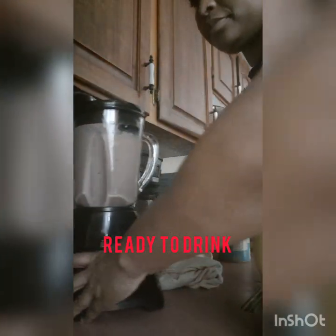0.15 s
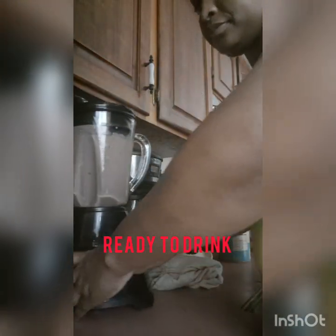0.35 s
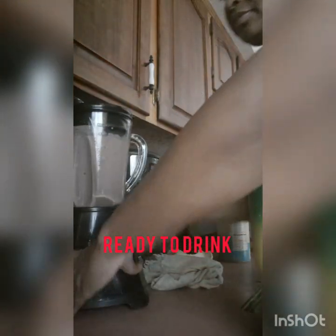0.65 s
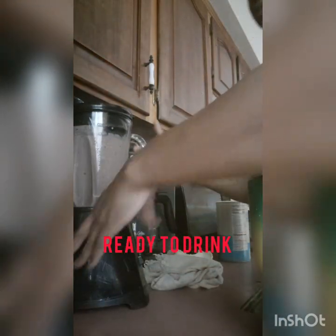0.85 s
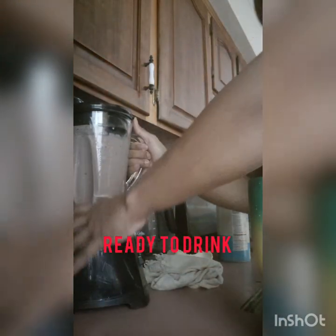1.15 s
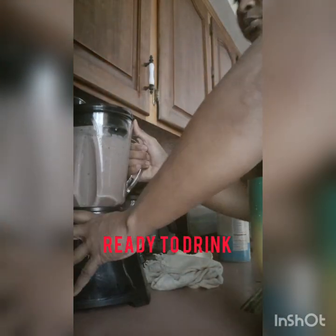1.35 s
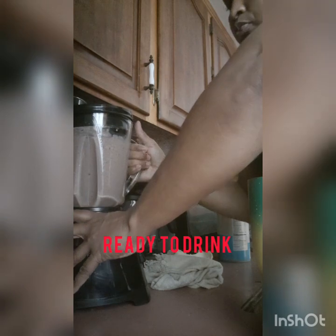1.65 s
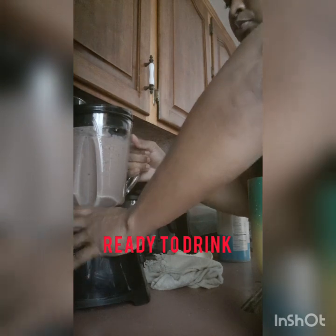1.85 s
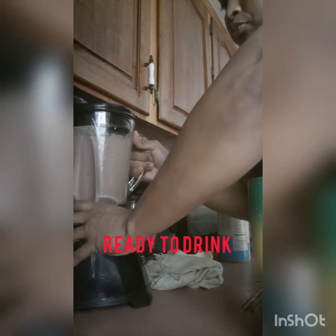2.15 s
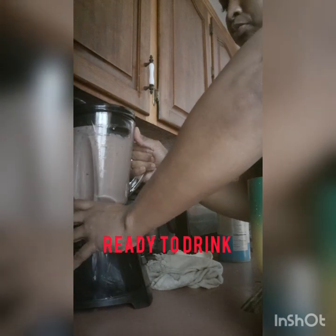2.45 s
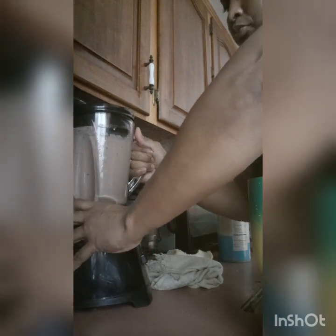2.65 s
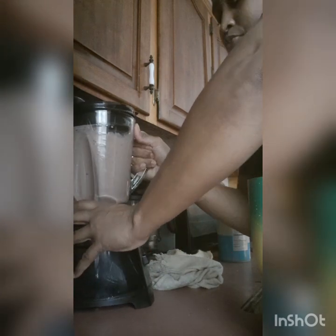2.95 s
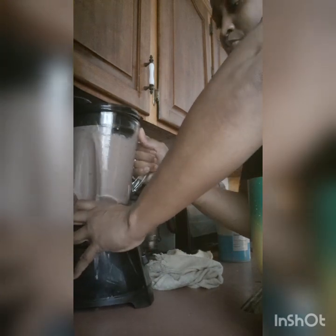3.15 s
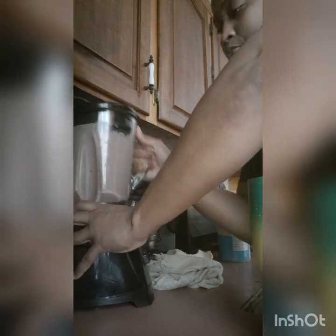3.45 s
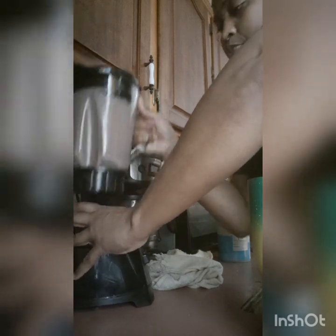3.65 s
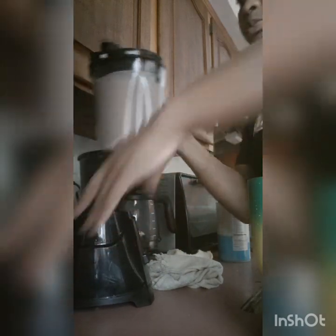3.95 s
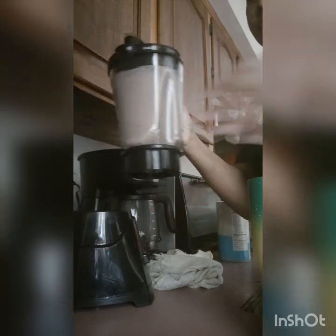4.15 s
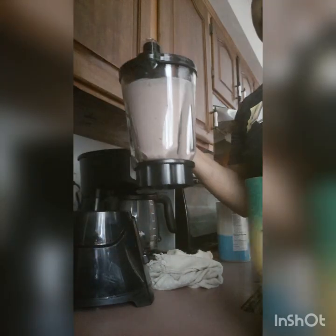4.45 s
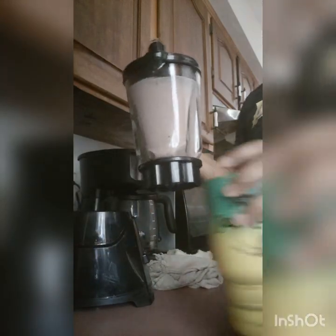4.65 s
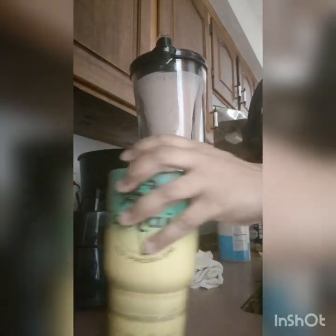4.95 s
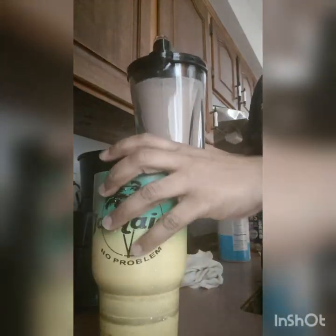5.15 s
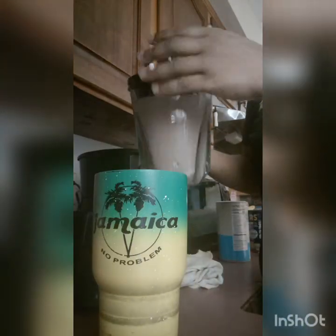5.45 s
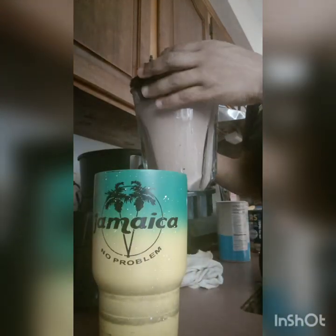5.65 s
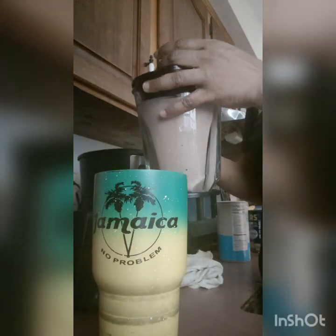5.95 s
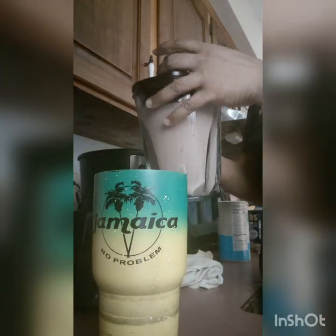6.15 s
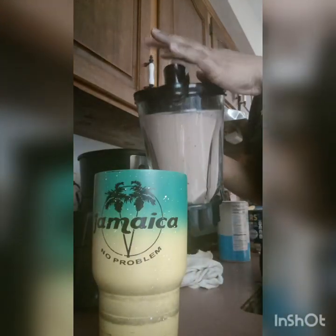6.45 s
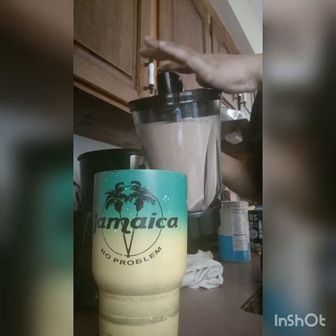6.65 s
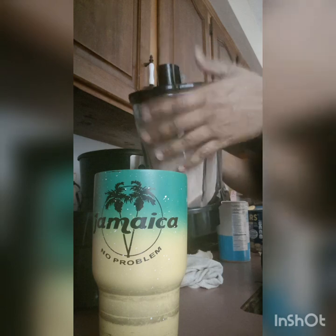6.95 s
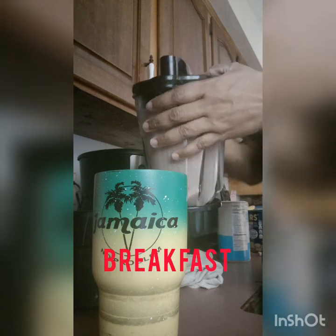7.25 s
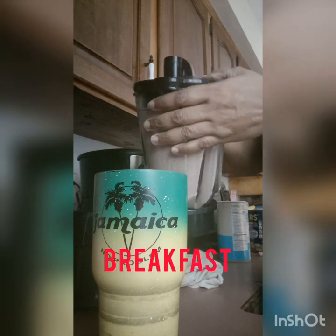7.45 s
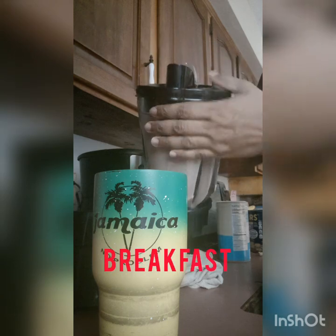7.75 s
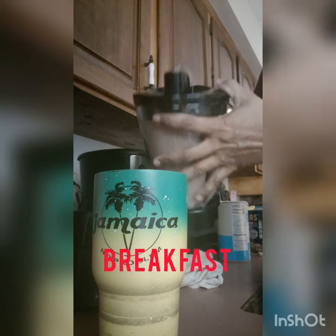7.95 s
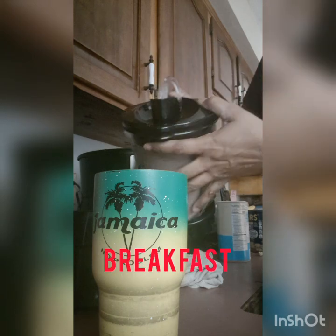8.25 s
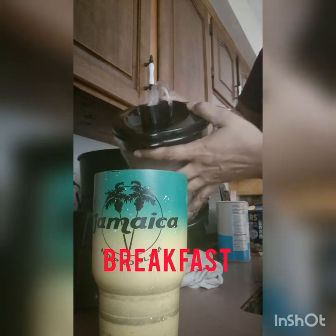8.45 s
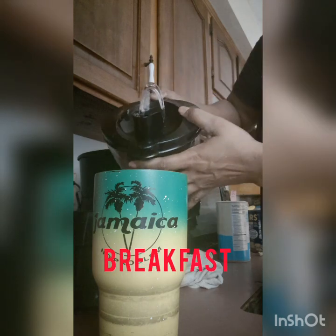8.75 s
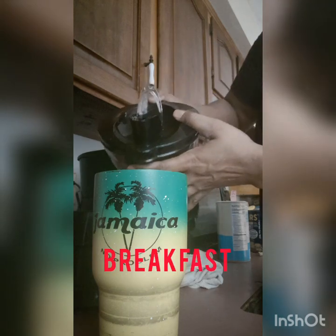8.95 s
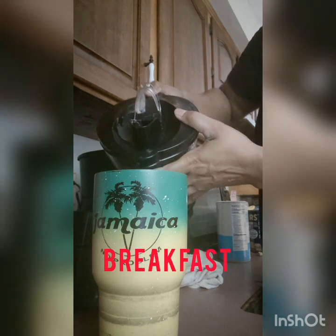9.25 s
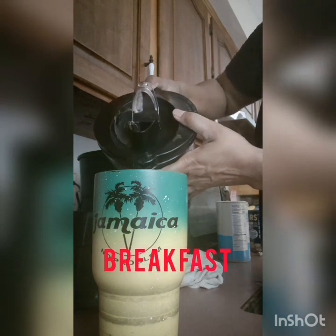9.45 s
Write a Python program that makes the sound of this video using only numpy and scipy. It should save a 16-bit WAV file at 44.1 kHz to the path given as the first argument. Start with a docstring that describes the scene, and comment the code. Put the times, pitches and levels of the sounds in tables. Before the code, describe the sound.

A full plastic blender jar knocks and clunks loose from its base, then a steel tumbler scrapes across the counter and lands with a heavy thud.

```python
"""First a palm brushes and a plastic blender base scuffs over a kitchen counter, then the full jar knocks
in its socket as it is twisted off. A steel tumbler is dragged over and set down ringing, then come
squeaks, thin whistles and rubbing as the lid is patted and pried loose. An appliance hums faintly behind.
Blows are dying sine modes and noise bursts; rubbing is filtered, grainy noise; friction keeps
the steel modes singing; the kitchen adds a diffuse tail."""
import sys
import numpy as np
from scipy import signal
from scipy.fft import rfft, irfft
from scipy.io import wavfile
from scipy.ndimage import uniform_filter1d

SR = 44100
rng = np.random.default_rng(int(sys.argv[2]) if len(sys.argv) > 2 else 0)


def store_pcm(level_fs):
    """Save levels as 16-bit WAV."""
    pcm = np.round(np.clip(level_fs, -1, 1) * 32767).astype(np.int16)
    wavfile.write(sys.argv[1], SR, np.atleast_2d(pcm).T)


N = 423360
TIME = np.arange(N) / SR  # every sample [s]
STEPS = np.arange(0, N / SR, 0.001)  # coarse clock for slow changes [s]

# Levels are in dB; some sounds add a further balance of their own.
# knocks of jar, base and lid: (time [s], hollow body level [dB], wall level [dB], crack level [dB],
# sharp edge against the crack [dB], favoured wall mode [Hz])
KNOCKS = [(0.052, -39.5, -39, -40, -20.5, 907), (0.3624, -38, -44.5, -42, -15, 641),
          (0.6445, -45.5, -28.5, -32, -26, 1090), (0.66, -38.5, -48, -64, -14.5, 700),
          (1.1611, -33.5, -33.5, -19.5, -13.5, 883), (1.696, -41.5, -54.5, -54, -27, 770),
          (1.7412, -39.5, -47.5, -34.5, -36.5, 1050), (2.2523, -34, -34, -40, -21, 759),
          (2.3437, -32.5, -30, -51, -25.5, 643), (2.4308, -31.5, -28.5, -39.5, -14.5, 720),
          (2.5009, -36, -41, -34, -26.5, 650), (2.5127, -33, -40.5, -23.5, -15.5, 2202),
          (2.8177, -37.5, -41, -29.5, -28.5, 3080), (2.832, -22.5, -30.5, -22, -21.5, 1180),
          (2.8853, -39.5, -44.5, -43.5, -17.5, 1100), (2.979, -36, -39.5, -56, -23.5, 808),
          (3.1571, -32, -39.5, -28, -16, 2790), (3.1762, -29.5, -41.5, -45, -12.5, 960),
          (3.2531, -40.5, -49, -46, -25.5, 800), (3.467, -47.5, -45, -48.5, -20.5, 1140),
          (3.5226, -43.5, -49, -40.5, -23, 1500), (3.5906, -39.5, -34.5, -21.5, -23.5, 2270),
          (3.6074, -38.5, -33.5, -50.5, -17, 1368), (3.7703, -44.5, -45.5, -47, -10.5, 690),
          (3.7848, -48, -45.5, -38.5, -20.5, 750), (3.817, -51.5, -39.5, -46, -12, 655),
          (6.3176, -50, -48, -37, -9, 1481), (6.338, -63.5, -51, -52.5, -6, 2810),
          (6.381, -59.5, -53, -54, -8, 1096), (6.8138, -35.5, -47.5, -51.5, -17.5, 546),
          (7.4702, -76.5, -40, -34.5, -6.5, 2820)]
# hollow ring of jar and base, before grip and damping: (frequency [Hz], level [dB], time to fall 60 dB [s])
JAR_MODES = [(97.57, -7.5, 0.1596), (174, -11, 0.16), (264.54, 1, 0.1163), (350.7, -7.5, 0.14),
             (388.6, 5, 0.0718), (460.3, -4, 0.084)]
# ringing of the plastic wall, before damping: (frequency [Hz], level [dB], time to fall 60 dB [s])
WALL_MODES = [(564.5, -11.5, 0.062), (708.6, 3, 0.027), (936, 2.5, 0.075), (1073, 8.5, 0.042),
              (1172, 13.5, 0.025), (1410, 0.5, 0.095), (1764.5, -2, 0.22), (2146, 1, 0.067),
              (2603, -17, 0.03), (2646, -9.5, 0.067), (2954, -10, 0.043)]
# colour of the plastic shell's dense ring: (frequency [Hz], level [dB per Hz])
SHELL_COLOUR = [(300, 13), (500, 5.5), (750, 7.5), (1150, 2.5), (1700, -6), (2150, -3.5), (2600, -7),
                (3200, -7), (4000, -6.5), (5200, -11.5), (7700, -6), (9000, -15), (15500, -24)]
KNOCK_LENGTH = 0.854  # factor on all ring times: the hand damps the plastic
CLACK_BODY_SHARE = 0.28  # the shell's clack follows the wall, and partly the body
CHATTER_S, CHATTER_DB = 0.009, -13.5  # loose plastic touches again about this much later, this much weaker

# scrapes of plastic on plastic, mostly short, with a long faint rub of the lid:
# (time [s], length [s], lowest frequency [Hz], highest frequency [Hz], level [dB])
SCRAPES = [(0.046, 0.0603, 910, 4440, -48), (0.575, 0.02, 890, 6040, -57), (0.619, 0.056, 890, 4200, -46.5),
           (1.848, 0.0538, 2220, 15200, -52), (2.623, 0.037, 1000, 8450, -61.5),
           (2.689, 0.0407, 790, 8000, -58), (2.909, 0.068, 2000, 8500, -63),
           (3.114, 0.0635, 1950, 8500, -63), (3.472, .03, 700, 2420, -52), (3.514, 0.0525, 1220, 8360, -53),
           (3.882, 0.35, 2300, 4600, -74.5), (6.316, 0.086, 11100, 16100, -56), (6.32, 0.1, 597, 4500, -58),
           (7.469, 0.177, 2130, 3236, -67.5), (7.698, 0.88, 2318, 2700, -85)]

# the base is shoved over the counter on juddering feet:
# (time [s], length [s], level [dB], start frequency [Hz], end frequency [Hz])
SHOVES = [(0.015, 0.136, -42.5, 607, 427), (0.237, 0.1894, -33, 416, 110), (0.462, 0.28, -44.5, 200, 230),
          (0.652, 0.018, -42.5, 297, 260)]
SHOVE_RISE_S, SHOVE_FALL_S, JUDDER_DB_PER_OCTAVE = 0.1215, 0.073, 7  # rise and fall: seconds per 20 dB
# colour of the scuffing: (frequency [Hz], level [dB per Hz])
SCUFF_COLOUR = [(29, -44), (50, -2), (96, 5), (216, -12), (256, 2.5), (310, -10.5), (358, -2), (423, -15),
                (652, -11), (1970, -23.5), (2170, -20.5), (4670, -30), (7020, -28), (15500, -45.5)]

# a palm brushes over the base: (time [s], length [s], level [dB], time to fall 20 dB [s])
BRUSHES = [(0.005, 0.134, -48.5, 0.0031), (0.193, 0.052, -49, 0.2), (0.268, 0.111, -53, 0.2623),
           (0.427, 0.062, -60.5, 0.48), (0.635, 0.0073, -50.5, 0.14), (0.759, 0.0254, -54.5, 0.0772)]
BRUSH_RISE_S = 0.0764  # seconds per 20 dB
# hands and sleeves shift on the jar: (time [s], length [s], low rumble level [dB], rustle level [dB])
GRIPS = [(0.842, 0.033, -58, -81), (1.205, 0.095, -48.5, -63.5), (1.736, 0.057, -43.5, -67),
         (1.846, 0.0236, -42.5, -63), (2.133, 0.185, -58.5, -69.5), (2.471, 0.25, -50, -70),
         (2.829, 0.027, -44, -62), (3.151, 0.135, -46.5, -64), (3.529, 0.058, -46.5, -62.5),
         (3.798, 0.222, -58.5, -69), (4.183, 0.173, -61, -71.5)]
GRIP_RISE_S, GRIP_FALL_S = 0.196, 0.401  # seconds per 20 dB
# colour of the rustle: (frequency [Hz], level [dB per Hz])
RUSTLE_COLOUR = [(500, 4.5), (1500, 2), (2600, 0.5), (4000, -0.5), (5000, -5), (7600, -1.5), (9200, -12),
                 (15500, -10)]
# fingers wipe off the tumbler and work at the lid: (time [s], length [s], level [dB])
WIPES = [(5.191, 0.0029, -57), (5.242, 0.034, -59.5), (5.604, 0.0104, -60.5), (5.712, 0.0081, -60.5),
         (6.078, 0.019, -62), (6.128, 0.086, -73.5), (6.318, 0.011, -51.5), (6.357, 0.0116, -59.5),
         (7.042, 0.0092, -66), (7.203, 0.087, -72), (7.503, 0.041, -68.5), (7.795, 0.037, -70.5),
         (7.874, 0.073, -72), (8.06, 0.015, -75), (9.133, 0.127, -66), (9.554, 0.0203, -73)]
WIPE_RISE_S, WIPE_FALL_S = 0.0393, 0.092  # seconds per 20 dB
# colour of the fingers: (frequency [Hz], level [dB per Hz])
FINGER_COLOUR = [(1200, -11.5), (2200, -4.5), (3400, -2.5), (5000, -6), (7500, 1.5), (9500, -5.5),
                 (14500, -8)]
# squeaks and thin whistles as fingers leave the tumbler and rub the lid:
# (time [s], length [s], start frequency [Hz], end frequency [Hz], level [dB])
SQUEAKS = [(5.22, 0.1074, 3252, 3239, -66.5), (5.597, 0.042, 3750, 3522, -73),
           (5.69, 0.057, 3766, 3640, -60.5), (6.068, 0.0576, 3850, 3900, -68.5),
           (6.178, 0.1325, 3157, 3290, -68), (6.183, 0.098, 2300, 2544, -68),
           (7.349, 0.2, 4194, 4350, -74.5)]

# thuds on the counter: (time [s], thud level [dB], hardness of the contact [dB])
THUDS = [(4.5, -28.5, -9), (4.583, -35, -18), (4.941, -28, -16), (4.956, -31, 3), (5.0349, -15, -10),
         (5.125, -37.5, -16), (5.168, -35.5, -17.5), (5.198, -35.5, 0), (9.187, -36, -20.5),
         (9.238, -30.5, -15.5), (9.326, -33.5, -16), (9.413, -36.5, -30)]
# counter top modes: (frequency [Hz], level [dB], time to fall 60 dB [s])
COUNTER_MODES = [(118.4, -16, 0.15), (202.4, -1.5, 0.1), (245.7, 2, 0.077), (301.4, -4, 0.044),
                 (380, -16.5, 0.07), (475.2, -10.5, 0.0736), (737, -25, 0.0428)]
CLACK_GROWTH = 0.44  # extra clack [dB] per dB of hardness
# grit catching under the tumbler's rim: (time [s], level [dB])
CATCHES = [(4.7133, -27.5), (4.812, -37.5), (4.83, -30), (4.845, -34), (4.942, -42.5), (5.146, -55.5)]

# the tumbler slides, louder and louder until it stops:
# (time [s], length [s], friction level [dB], wall ringing level [dB], ringing's time to fall 20 dB [s])
SLIDES = [(4.53, 0.282, -30.5, 2, 0.1348), (4.931, 0.0491, -37.5, -2, 0.7076)]
SLIDE_RISE_S, SLIDE_STOP_S = 0.03, 0.0426  # seconds per 20 dB
TIPPED_S, TIPPING_S = 4.95, 0.016  # the tumbler tips onto its rim's edge: start, length
SEATED_S, SEATING_S, SEATED_DB = 5.078, 0.025, -35  # the base comes down flat and damps the wall
# colour of the dragging: (frequency [Hz], level [dB per Hz])
DRAG_COLOUR = [(59, -48.5), (100, -11), (248, 16), (420, -10.5), (640, -7), (898, -8), (1090, -17.5),
               (1920, -21.5), (3930, -20.5), (4190, -18.5), (4660, -27.5), (8060, -22), (8770, -24),
               (13100, -27.5), (15500, -25)]
GRIT_PER_S, GRIT_SPREAD_DB = 140, 7  # tiny catches under the sliding rim
# steel wall modes: (frequency [Hz], level while sliding [dB], level while tipped on the rim's edge [dB])
STEEL_MODES = [(1098, -43, -46), (1378, -58, -55), (1568, -53, -64), (2330, -64, -66), (2501, -55, -69),
               (2653, -51, -65), (2736, -50, -67), (2840, -56, -78), (2982, -54, -72), (3032, -52, -71),
               (3235, -56, -78), (3402, -57, -78), (3720, -54, -80), (3844, -53, -70), (3951, -61, -58),
               (4203, -45, -63), (5001, -59, -65), (5762, -59, -54), (5858, -52, -66), (6095, -53, -78),
               (7583, -57, -72), (7855, -53, -62), (8142, -62, -59), (8212, -54, -69), (10148, -63, -73),
               (10907, -66, -76), (12706, -60, -80), (12938, -66, -62), (13200, -64, -63),
               (15434, -66, -76)]
# a faint metallic ring as the tumbler is let go, and as the jar is tipped towards it:
# (time [s], length [s], level [dB])
SHIMMERS = [(5.213, 0.0176, -14.5), (9.129, 0.0895, -3)]
SHIMMER_RISE_S, SHIMMER_FALL_S = 0.053, 0.29  # seconds per 20 dB
# modes of that faint ring: (frequency [Hz], level [dB])
SHIMMER_MODES = [(1077, -66), (2280, -75), (3682, -67), (5715, -71), (5990, -80), (7364, -74), (7810, -80)]

# colour of the low room air: (frequency [Hz], level [dB per Hz])
AIR_COLOUR = [(15, -57.5), (25, -32.5), (44, -10), (69, -6), (134, -13.5), (192, -2.5), (222, -4.5),
              (290, -6), (353, -17.5), (386, -8), (415, -14.5), (462, -14), (1210, -29.5), (1560, -41.5),
              (1800, -35), (2340, -80.5), (3960, -120)]
# colour of the thin hiss: (frequency [Hz], level [dB per Hz])
HISS_COLOUR = [(1000, -12.5), (1900, -14.5), (2250, -0.5), (2480, 3.5), (2750, -4), (3200, -8), (4200, 0),
               (5200, -12), (7500, -0.5), (9500, -9), (15500, -11)]
AIR_DB, HISS_DB = -52, -76.5
# appliance hum: (frequency [Hz], level [dB])
HUM = [(59.2, -65), (199.2, -63.5), (646, -71.5), (708, -84)]
# kitchen echo tail: (frequency [Hz], time to fall 60 dB [s])
KITCHEN_DECAY = [(100, 0.925), (250, 0.48), (1000, 0.47), (4000, 0.37), (8000, 0.254), (15000, 0.46)]
# likeness of the noise at the two microphone ports: (frequency [Hz], correlation [-1 to 1])
PORT_LIKENESS = [(60, 0.94), (300, 0.95), (600, 0.62), (1200, -0.14), (2500, -0.03), (15000, 0)]
# how near sounds lean to one side, before scaling: (frequency [Hz], left minus right [dB])
SIDE_DB = [(60, 0), (200, -2.5), (400, 1.5), (700, -8.5), (1200, 1.5), (2400, 1), (4400, -11.5), (7400, -8),
           (9000, 0), (15000, 3.5)]
EDGE_HZ = 15900  # upper band limit


def knocks():
    """Each knock rings the hollow jar, its wall and its shell, with a crack and a sharp edge on top."""
    out, t = np.zeros((2, N)), np.arange(2 ** 13) / SR
    for s, body_db, wall_db, crack_db, edge_db, favoured_hz in KNOCKS:
        # the grip shifts the hollow modes a little from blow to blow
        modes = [(hz * rng.uniform(0.97, 1.04), db + rng.normal(0, 1.5), t60 * KNOCK_LENGTH)
                 for hz, db, t60 in JAR_MODES]
        body = ring(modes, t, rise=0.00577, lag_s=0.000117)
        clack = chatter(burst(t, 429, 2403, t60=0.0893 * KNOCK_LENGTH))
        crack = chatter(burst(t, 1640, 8400, t60=0.0612 * KNOCK_LENGTH))
        edge = burst(t, 6450, 16000, t60=0.072 * KNOCK_LENGTH)
        clack_db = wall_db + CLACK_BODY_SHARE * (body_db - wall_db)
        add(out, s, gain_of(body_db - 2.0) * body)
        add(out, s, gain_of(wall_db - 4.5) * wall(t, favoured_hz, KNOCK_LENGTH))
        add(out, s, gain_of(clack_db - 5.5) * clack)
        add(out, s, gain_of(crack_db - 8.0) * crack)
        add(out, s, gain_of(crack_db + edge_db + 0.36) * edge)
    return out


def wall(t, favoured_hz, length, spread=0.1855):
    """The contact point decides which modes of the plastic wall ring most."""
    out = np.zeros((2, len(t)))
    for hz, db, t60 in WALL_MODES:
        share = 1 / (1 + (np.log(hz / favoured_hz) / spread) ** 4)
        port_phase = rng.uniform(0.1, 1, (2, 1)) * hz / 1500
        decay = np.exp(-np.log(1000) * t / (t60 * length))
        out += share * gain_of(db) * decay * np.sin(2 * np.pi * hz * t + port_phase)
    return peaked(out * (1 - np.exp(-t / 0.00048)))


def chatter(blow):
    """A blow is followed by the weaker second touch of a loose part."""
    out = blow.copy()
    delay_s = CHATTER_S * rng.uniform(0.6, 1.4)
    add(out, delay_s, gain_of(CHATTER_DB) * blow[::-1])  # left and right swapped
    return out


def scrapes(grain_db=1.5):
    """Plastic slides on plastic, mostly briefly: a rough rasp that builds fast and fades."""
    out, slips = np.zeros((2, N)), wander(250)
    for s, length, lo_hz, hi_hz, db in SCRAPES:
        size = int(max(length, 0.01) * SR)
        arch = np.sin(np.pi * np.linspace(0, 1, size) ** 0.596)
        pressure = arch * gain_of(grain_db * slips[int(s * SR):][:size])
        rasp = band(noise(SHELL_COLOUR, size=size) * pressure, lo_hz, hi_hz)
        add(out, s, gain_of(db) * evened(rasp))
    return out


def base():
    """The base shudders, drags and scuffs over the counter: rubbing noise in three bands."""
    shudder = judder(centre_hz=100.7) * friction(SCUFF_COLOUR, 55, 169, grain_db=2.25)
    drag = judder(centre_hz=306) * friction(SCUFF_COLOUR, 144, 526, grain_db=0.5)
    scuff = judder(centre_hz=938.5) * friction(SCUFF_COLOUR, 440, 1900, grain_db=3)
    return gain_of(-3.0) * shudder + gain_of(-4.38) * drag + gain_of(-0.38) * scuff


def judder(centre_hz):
    """A band is loudest while the feet judder near its centre frequency."""
    swells = []
    for s, length, db, start_hz, end_hz in SHOVES:
        judder_hz = start_hz + (end_hz - start_hz) * progress(s, length)
        octaves = np.log2(judder_hz / centre_hz)
        swells.append(db + swell(s, length, SHOVE_RISE_S, SHOVE_FALL_S) - JUDDER_DB_PER_OCTAVE * abs(octaves))
    return level(swells)


def palm():
    """A palm brushes the base: bright rubbing noise."""
    brush = level([db + swell(s, length, BRUSH_RISE_S, fall_s) for s, length, db, fall_s in BRUSHES])
    return gain_of(-1.27) * brush * friction(SCUFF_COLOUR, 1673, 17000, grain_db=1.36)


def grips():
    """Hands and sleeves shift on the jar: a slow low rumble and a finer rustle."""
    rumble = level([db + swell(s, length, GRIP_RISE_S, GRIP_FALL_S) for s, length, db, _ in GRIPS])
    rustle = level([db + swell(s, length, GRIP_RISE_S, GRIP_FALL_S) for s, length, _, db in GRIPS])
    out = gain_of(-3) * rumble * friction(SCUFF_COLOUR, 43.85, 754.4, grain_db=5, slips=19.6)
    return out + gain_of(1.71) * rustle * friction(RUSTLE_COLOUR, 807, 16000, grain_db=1.39, slips=94)


def fingers():
    """Fingers wipe off the tumbler and rub the lid: grainy treble noise."""
    wipe = level([db + swell(s, length, WIPE_RISE_S, WIPE_FALL_S) for s, length, db in WIPES])
    return gain_of(-0.22) * wipe * friction(FINGER_COLOUR, 1000, 14800, grain_db=3.0, slips=108)


def squeaks(jitter=0.0552):
    """Squeaks and thin whistles as fingers leave the tumbler and rub the lid: gliding, unsteady tones."""
    out, unsteady = np.zeros((2, N)), wander(910)
    for s, length, start_hz, end_hz, db in SQUEAKS:
        size = int(max(length, 0.01) * SR)
        hz = np.linspace(start_hz, end_hz, size) * (1 + jitter * unsteady[int(s * SR):][:size])
        tone = np.sqrt(2) * np.sin(2 * np.pi * np.cumsum(hz) / SR)
        add(out, s, gain_of(db) * (np.hanning(size) * tone)[None])
    return out


def thuds():
    """Tumbler and jar bump the counter top, which booms; harder contacts clack and click more."""
    out, t = np.zeros((2, N)), np.arange(2 ** 13) / SR
    for s, db, hardness_db in THUDS:
        add(out, s, gain_of(db + 1) * ring(COUNTER_MODES, t, rise=0.00288, lag_s=0.00043))
        add(out, s, gain_of(db + CLACK_GROWTH * hardness_db - 16.0) * burst(t, 450, 1610, t60=0.128))
        add(out, s, gain_of(db + hardness_db - 16.0) * burst(t, 2300, 10020, t60=0.03))
    return out


def catches():
    """Grit catches under the tumbler's rim: single short noise ticks."""
    out, t = np.zeros((2, N)), np.arange(2 ** 13) / SR
    for s, db in CATCHES:
        add(out, s, gain_of(db) * burst(t, 899.5, 15000, t60=0.036))
    return out


def tumbler():
    """The dragged rim judders the counter, grinds, and sets the steel wall singing."""
    boom = ring(COUNTER_MODES, np.arange(2 ** 13) / SR, rise=0.0013, lag_s=0.0004)
    booming = evened(signal.oaconvolve(rng.standard_normal((1, N)), boom)[:, :N])
    grinding = friction(DRAG_COLOUR, 422.4, 1800, grain_db=1.0)
    rasp = friction(DRAG_COLOUR, 1600, 16000, grain_db=1.5, slips=200) + gain_of(-11.5) * grit()
    scraping = through_wall(rasp, width_hz=60, valley_db=-13.5)
    out = gain_of(-5.5) * sliding(build_db=16.5, bend=5.24) * booming
    out += gain_of(-2.59) * sliding(build_db=32.5, bend=2.15) * grinding
    out += gain_of(0.17) * sliding(build_db=33.5, bend=1.023) * scraping
    tipped = progress(TIPPED_S, TIPPING_S)
    return out + steel(STEEL_MODES, singing(build_db=31.5), tipped, width_hz=7, flutter_db=3.5)


def shimmer():
    """A few steel modes ring faintly, waking and dying smoothly."""
    swells = [db + swell(s, length, SHIMMER_RISE_S, SHIMMER_FALL_S) for s, length, db in SHIMMERS]
    tipped = progress(TIPPED_S, TIPPING_S)
    return steel(SHIMMER_MODES, np.max(swells, axis=0), tipped, width_hz=8.26, flutter_db=2, lag_cycles=139)


def sliding(build_db, bend):
    """Friction grows by build_db over a slide; with a high bend it is full early."""
    swells = []
    for s, length, db, _, _ in SLIDES:
        still_missing_db = build_db * (1 - progress(s, length)) ** bend
        swells.append(db - still_missing_db + swell(s, length, SLIDE_RISE_S, SLIDE_STOP_S))
    return level(swells)


def singing(build_db):
    """The wall's ringing (dB) builds with each slide and dies away; seating the tumbler damps it further."""
    swells = []
    for s, length, _, db, ring_s in SLIDES:
        still_missing_db = build_db * (1 - progress(s, length))
        swells.append(db - still_missing_db + swell(s, length, SLIDE_RISE_S, ring_s))
    return np.max(swells, axis=0) + SEATED_DB * progress(SEATED_S, SEATING_S)


def steel(modes, drive_db, tipped, width_hz, flutter_db, lag_cycles=0):
    """Friction keeps wall modes ringing and jogs their phase and strength; tipping can change their mix."""
    out = np.zeros((2, N))
    live = np.interp(TIME, STEPS, drive_db) > -80  # skip the silent stretches
    for hz, *dbs in modes:
        jogs = rng.standard_normal(len(STEPS))
        drift = np.cumsum(jogs) * np.sqrt(2 * np.pi * abs(width_hz) * STEPS[1])
        flutter = flutter_db * evened(uniform_filter1d(rng.standard_normal(len(STEPS)), size=24))
        # a light touch already wakes the low modes; high ones need force
        response = min((hz / 3000) ** 0.243, 1.2)
        # with a lag, low modes wake and die later
        driven_db = response * np.interp(STEPS - lag_cycles / hz, STEPS, drive_db)
        mix = (1 - tipped) * gain_of(dbs[0]) + tipped * gain_of(dbs[-1])
        strength = mix * gain_of(driven_db + flutter)
        envelope = np.interp(TIME[live], STEPS, strength * np.exp(1j * drift))
        mode = envelope * np.exp(2j * np.pi * hz * TIME[live])
        port_phase = rng.choice([-1, 1]) * min(hz / 2000, np.pi / 2)
        out[:, live] += np.sqrt(2) * np.array([mode.real, (mode * np.exp(1j * port_phase)).real])
    return out


def grit():
    """Sparse random ticks of uneven size, from grit under the rim."""
    size_db = GRIT_SPREAD_DB * np.minimum(rng.exponential(1, N), np.pi)
    ticks = (rng.random(N) < GRIT_PER_S / SR) * gain_of(size_db)
    tick = burst(np.arange(2 ** 10) / SR, 1000, 14000, t60=0.0037)
    return evened(signal.oaconvolve(ticks[None], tick, axes=1)[:, :N])


def through_wall(x, width_hz, valley_db, contrast=0.36):
    """Scraping noise radiates best near the steel wall's modes, most of all the strong ones."""
    f = np.fft.rfftfreq(N, 1 / SR)
    loudest_db = max(db for _, db, _ in STEEL_MODES)
    peaks = np.max([gain_of(contrast * (db - loudest_db)) / (1 + ((f - hz) / width_hz) ** 2)
                    for hz, db, _ in STEEL_MODES], axis=0)
    return evened(irfft(rfft(x) * (gain_of(valley_db) + peaks), N))


def background():
    """Low room air and thin hiss are coloured noise; the appliance hum is sines of wavering phase."""
    air = gain_of(AIR_DB) * evened(noise(AIR_COLOUR) * gain_of(0.32 * wander(6.9)))
    hiss = gain_of(HISS_DB) * noise(HISS_COLOUR)
    hum = sum(gain_of(db) * np.sqrt(2) * np.sin(2 * np.pi * hz * TIME + 0.664 * wander(0.88))
              for hz, db in HUM)
    return air + hum + hiss


def kitchen(x):
    """A diffuse tail off cupboards and walls: noise whose bands each die at their own speed."""
    flat = noise([(20, 0), (20000, 0)], size=2 ** 15)
    hz, t, z = signal.stft(flat, SR, nperseg=256)
    decay = np.exp(-np.log(1000) * t / read(KITCHEN_DECAY, hz)[:, None])
    onset = 1 - np.exp(-t / 0.0016)
    tail = signal.istft(z * decay * onset, SR, nperseg=256)[1]
    return signal.oaconvolve(x, tail / np.linalg.norm(tail[0]), axes=1)[:, :N]


def ring(modes, t, rise, lag_s):
    """Modes die away after a blow whose contact takes rise seconds."""
    arrival = t - np.array([[lag_s], [0]])  # the wave reaches the right port first
    wave = sum(gain_of(db) * np.exp(-np.log(1000) * t / t60) * np.sin(2 * np.pi * hz * arrival)
               for hz, db, t60 in modes)
    return peaked(wave * (1 - np.exp(-t / rise)))


def burst(t, lo_hz, hi_hz, t60):
    """Crowded, quickly dying modes within one band, made from decaying noise."""
    decay = np.exp(-np.log(1000) * t / t60)
    return peaked(band(noise(SHELL_COLOUR, size=len(t)) * decay, lo_hz, hi_hz))


def friction(colour, lo_hz, hi_hz, grain_db, slips=150):
    """Rubbing noise comes in uneven little slips, about slips times a second."""
    return evened(band(noise(colour) * gain_of(grain_db * wander(slips)), lo_hz, hi_hz))


def noise(colour, size=N):
    """Coloured noise at two ports, alike in the bass and nearly unrelated in the treble."""
    a, b = rfft(rng.standard_normal((2, size)))
    hz = np.fft.rfftfreq(size, 1 / SR)
    same = np.clip(read(PORT_LIKENESS, hz), -1, 1)
    ports = np.array([a, same * a + np.sqrt(1 - same ** 2) * b])
    return evened(irfft(ports * gain_of(read(colour, hz)), size))


def wander(rate):
    """Smooth chance of unit size that changes about rate times a second."""
    smoothing = 1 + (np.fft.rfftfreq(N, 1 / SR) / rate) ** 2
    return evened(irfft(rfft(rng.standard_normal(N)) / smoothing ** 2, N))


def progress(s, length):
    """Runs from 0 to 1 during a movement."""
    return np.clip((STEPS - s) / max(length, 1e-3), 0, 1)


def swell(s, length, rise_s, fall_s):
    """Attack, hold and release in dB; rise and fall are the times taken for 20 dB."""
    before, after = np.maximum(s - STEPS, 0), np.maximum(STEPS - s - length, 0)
    return -20 * (before / rise_s + after / fall_s)


def level(swells):
    """The gain of the loudest of several swells (dB) at each moment."""
    return np.interp(TIME, STEPS, gain_of(np.maximum(np.max(swells, axis=0), -200)))


def lean(x, amount):
    """Near sounds reach the two ports with different colours."""
    lean_db = amount * read(SIDE_DB, np.fft.rfftfreq(N, 1 / SR)) / 2
    return irfft(rfft(x) * gain_of([lean_db, -lean_db]), N)


def band(x, lo_hz, hi_hz):
    """Causal band-pass."""
    sos = signal.butter(3, [lo_hz, min(hi_hz, SR / 2 - 1)], "band", fs=SR, output="sos")
    return signal.sosfilt(sos, x)


def read(points, hz):
    """Reads a table on a logarithmic frequency axis."""
    f, value = np.transpose(points)
    return np.interp(np.log(hz + 1), np.log(f + 1), value)


def gain_of(db):
    """Decibels to amplitude."""
    return 10 ** (np.asarray(db) / 20)


def evened(x):
    """Scales to an rms of one."""
    return x / np.sqrt(np.mean(x ** 2) + 1e-20)


def peaked(x):
    """Scales the loudest 6 ms to an rms of one."""
    return x / np.sqrt(uniform_filter1d(np.mean(x ** 2, 0), size=256).max() + 1e-20)


def add(mix, s, sound):
    """Mixes a sound in at time s."""
    part = mix[:, max(round(s * SR), 0):][:, :sound.shape[1]]
    part += sound[:, :part.shape[1]]


def scene():
    """Jar and tumbler are close by; the kitchen surrounds them."""
    jar_blows = knocks() + scrapes()
    jar_rubs = base() + palm() + grips() + fingers() + squeaks()
    cup = thuds() + catches() + tumbler() + shimmer()
    near = lean(jar_blows, amount=0.814) + lean(jar_rubs, amount=0.806) + lean(cup, amount=0.97)
    echo = kitchen(gain_of(-15) * jar_blows + gain_of(-12.5) * jar_rubs + gain_of(-14.5) * cup)
    return near + echo + background()


def record(dry):
    """The microphone loses the deepest bass; then the top of the treble is cut off."""
    thinned = signal.sosfilt(signal.butter(2, 42, "high", fs=SR, output="sos"), dry)
    treble_cut = signal.firwin(511, EDGE_HZ, window=("kaiser", 9), fs=SR)
    return signal.oaconvolve(thinned, treble_cut[None], "same")


dry = scene()
out = record(dry)
store_pcm(out)
```